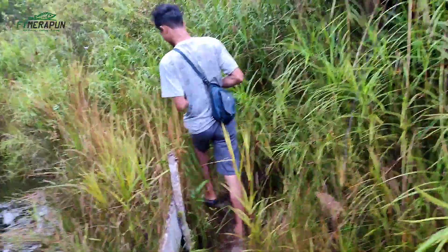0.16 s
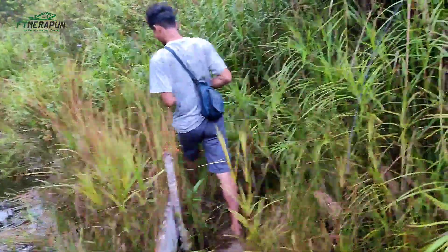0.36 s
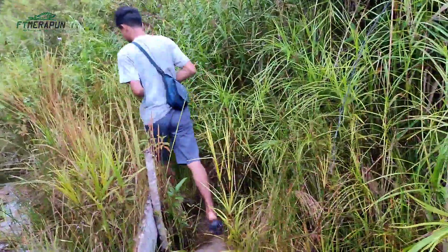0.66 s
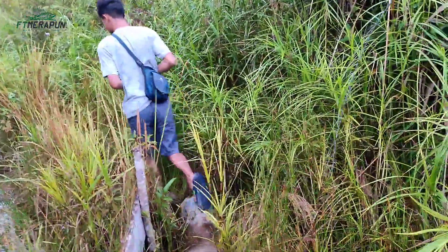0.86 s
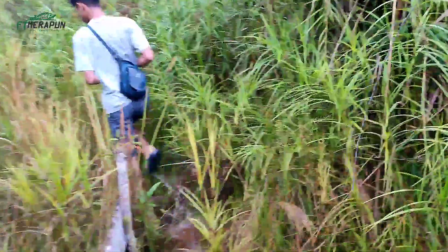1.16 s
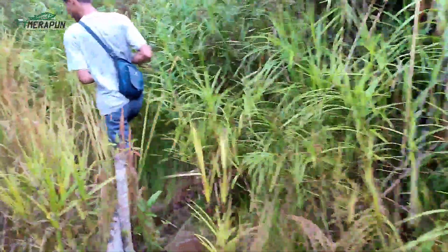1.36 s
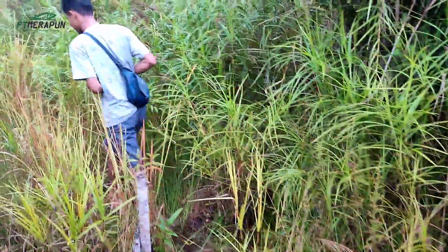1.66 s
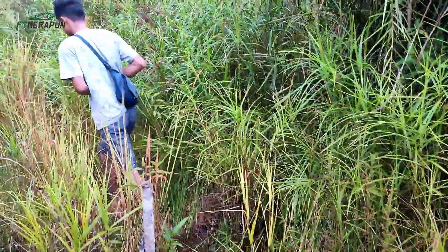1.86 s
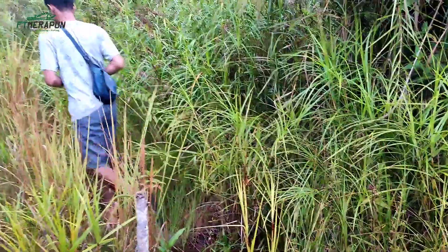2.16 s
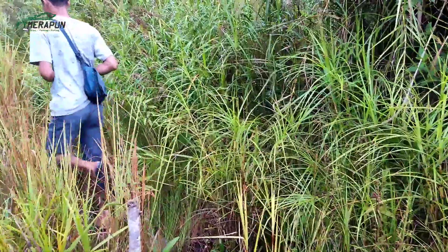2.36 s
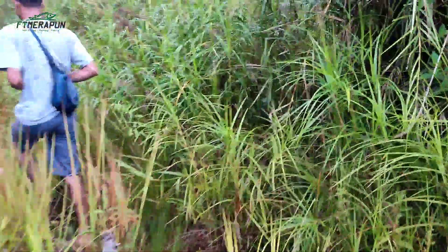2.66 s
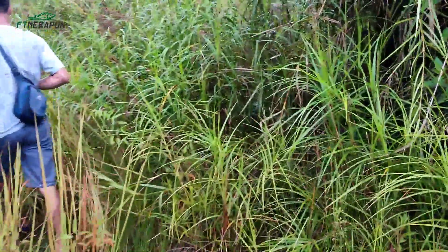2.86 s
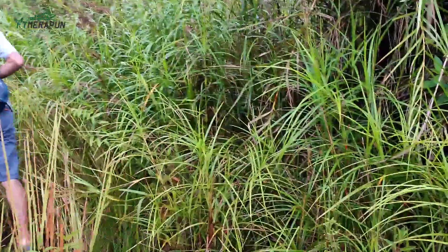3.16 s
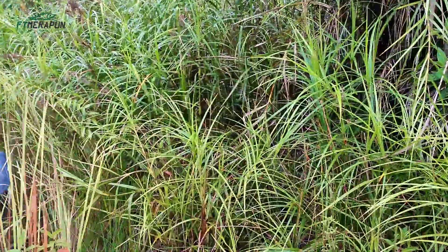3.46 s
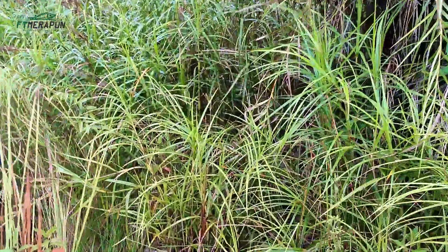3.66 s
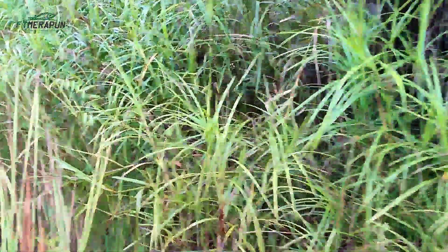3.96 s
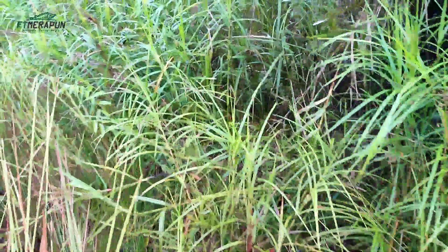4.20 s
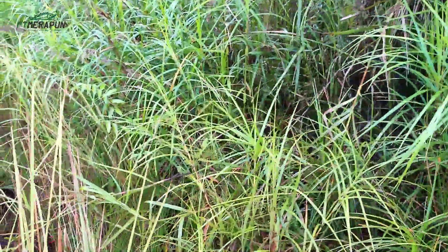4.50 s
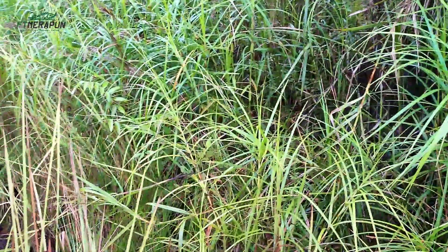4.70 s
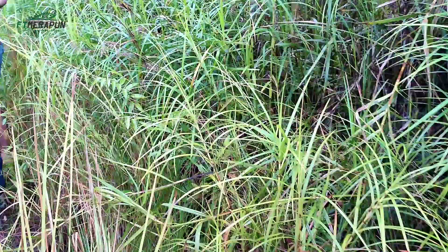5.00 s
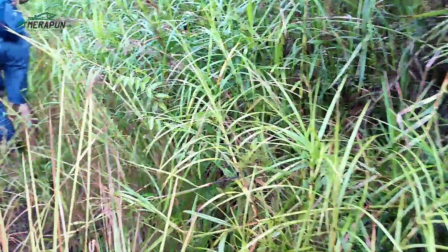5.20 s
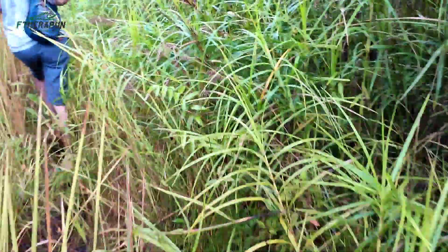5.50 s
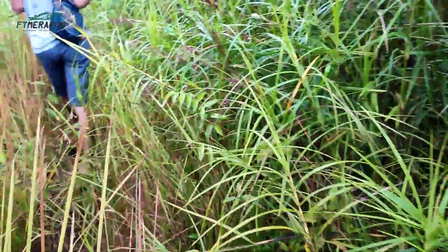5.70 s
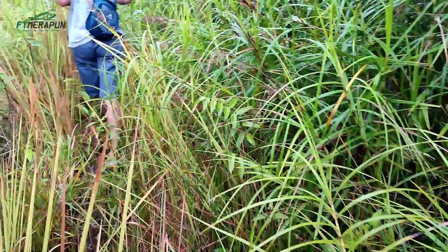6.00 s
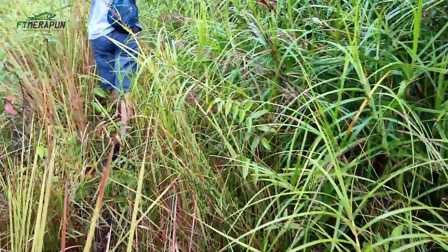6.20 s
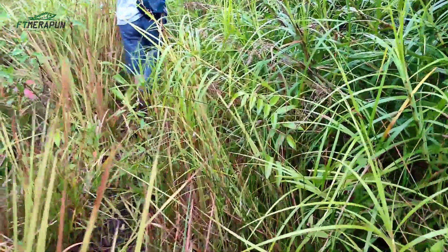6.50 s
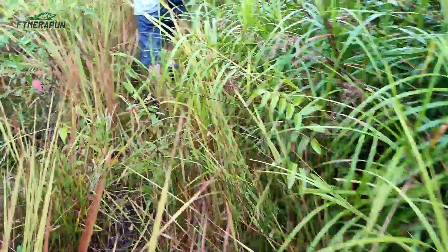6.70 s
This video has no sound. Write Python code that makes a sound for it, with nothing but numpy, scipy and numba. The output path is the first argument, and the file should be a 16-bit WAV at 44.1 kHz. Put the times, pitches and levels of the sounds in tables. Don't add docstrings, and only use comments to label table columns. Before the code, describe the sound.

Squelching, splashy footsteps push through wet tall grass, stalks snapping and blades rustling, over a steady thin cicada drone in an open marsh.

```python
import sys
import numpy as np
from scipy import signal
from scipy.fft import rfft, irfft
from scipy.io import wavfile
from scipy.ndimage import uniform_filter1d
from numba import njit

SR = 44100
rng = np.random.default_rng(int(sys.argv[2]) if len(sys.argv) > 2 else 0)


def gain_from_decibels(decibels):
    exponent = np.asarray(decibels, float) / 20
    return 10 ** exponent


def output_pcm(signal):
    pcm = np.clip(np.atleast_2d(signal).T, -1, 1) * 32767
    wavfile.write(sys.argv[1], SR, np.round(pcm).astype(np.int16))


N = 302085
T = np.arange(N) / SR
HZ = np.maximum(np.fft.rfftfreq(N, 1 / SR), 1)

# (time [s], hold [s], level [dB])
WADES = [(.0, 0.092, -53), (.3, 0.17, -50), (.6, 0.18, -52.5), (1.0, 0.39, -58), (1.38, 0.033, -46.5),
         (1.7, 0.27, -52), (2.0, 0.1, -58), (2.37, 0.0061, -54.5), (2.57, 0.12, -47), (3.1, 0.25, -48),
         (3.42, 0.31, -53), (4.0, 0.025, -53.5), (4.14, 0.016, -48.5), (4.66, 0.16, -57), (5.1, 0.029, -56),
         (5.31, 0.015, -52.5), (5.45, 0.074, -55.5), (5.8, 0.2, -47.5), (6.72, .13, -61)]
# (time [s], hold [s], thin stems [dB], thick minus thin stems [dB])
PUSHES = [(-0.002, 0.082, -43, -2.5), (0.285, 0.09, -46.5, -2), (0.472, 0.22, -46, -3),
          (0.81, 0.23, -49.5, -3), (1.07, 0.2, -49, -18), (1.267, 0.023, -42.5, -7.5),
          (1.41, 0.31, -46.5, -10), (2.095, 0.19, -51, 0), (2.36, 0.0088, -42, -6), (2.567, 0.039, -45, -4),
          (2.645, 0.22, -45, -9), (3.096, 0.22, -52.5, 4.5), (3.407, 0.22, -55, -1),
          (3.698, 0.055, -39, -2.5), (3.997, 0.026, -36.5, -6.5), (4.107, 0.027, -37.5, -10.5),
          (4.196, 0.026, -44, -10), (3.955, 0.011, -43.5, -3), (4.296, 0.023, -50.5, 0),
          (4.513, 0.24, -52.5, -10), (4.927, 0.078, -49, -1), (5.12, 0.011, -41.5, -3.5),
          (5.288, 0.016, -44.5, -4), (5.4, 0.033, -42.5, -6), (5.645, 0.026, -49, -5.5),
          (5.784, 0.29, -48.5, -2.5), (6.136, 0.23, -49.5, -1), (6.579, 0.012, -42.5, -7),
          (6.654, 0.019, -44.5, -9), (6.808, .1, -40, -6)]
# (time [s], peak level [dB], pitch [Hz], time to fade 60 dB [s])
RISERS = [(.004, -25.5, 1386, 0.04), (0.079, -25, 764, 0.043), (1.311, -17, 232, 0.047),
          (1.428, -35.5, 1065, 0.11), (2.045, -33.5, 436, 0.12), (2.245, -40, 807, 0.082),
          (2.351, -30, 1695, 0.076), (3.214, -30, 287, 0.132), (3.215, -21.5, 1495, 0.061),
          (3.224, -29.5, 846, 0.061), (3.239, -36, 416, 0.3), (4.16, -19, 782, 0.038),
          (4.415, -44, 793, 0.075), (4.78, -37.5, 684, 0.072), (4.81, -46, 461, 0.25),
          (4.92, -35, 1000, 0.078), (5.475, -37.5, 438, 0.08), (5.61, -36.5, 580, 0.16),
          (5.676, -29.5, 509, 0.051), (5.78, -22, 427, 0.054), (6.182, -30, 694, 0.051),
          (6.65, -40, 890, 0.043), (6.796, -18.5, 890, 0.013)]
# (time [s], peak level [dB], pitch [Hz], time to fade 60 dB [s])
HELD = [(0.055, -28, 970, 0.025), (.062, -34, 2680, 0.036), (0.305, -29, 1590, .028),
        (.362, -34.5, 584, 0.038), (1.043, -29, 1200, 0.017), (1.254, -33, 235, 0.048),
        (1.497, -32.5, 980, 0.02), (1.566, -26, 2640, 0.018), (1.81, -32, 1620, 0.025),
        (2.07, -32, 896, 0.041), (2.424, -31.5, 1400, 0.034), (3.092, -20, 438, 0.095),
        (3.11, -36, 2090, 0.098), (3.109, -20, 516, 0.028), (3.135, -22.5, 444, 0.066),
        (3.157, -35, 407, 0.091), (4.19, -39, 477, 0.15), (3.162, -23, 2460, 0.036),
        (3.199, -31, 488, 0.071), (3.226, -37.5, 265, 0.16), (3.412, -32.5, 730, 0.051),
        (4.564, -31, 477, 0.056), (4.679, -34.5, 425, 0.11), (5.122, -23.5, 1044, 0.032),
        (5.808, -19.5, 522, 0.034), (6.0, -29.5, 560, 0.035), (6.157, -34, 990, 0.049),
        (6.36, -28, 2500, 0.03), (6.754, -28, 1090, 0.01)]
# (time [s], peak level [dB], pitch [Hz], time to fade 60 dB [s])
PLOPS = [(1.372, -22, 216, 0.027), (2.584, -21.5, 377, 0.015), (2.599, -35, 308, 0.072),
         (2.643, -20, 990, 0.013), (2.682, -25.5, 224, 0.024), (3.259, -25, 600, 0.02),
         (3.727, -22.5, 1226, 0.045), (4.033, -21.5, 253, 0.014), (5.045, -32, 980, 0.03),
         (5.386, -22, 837, 0.032), (5.405, -27.5, 248, 0.038), (5.13, -34.5, 436, 0.041),
         (6.592, -31, 483, 0.039), (6.805, -14.5, 294, 0.026)]
# (time [s], peak level [dB], pitch [Hz])
SLAPS = [(0.558, -24.5, 1120), (1.249, -18, 590), (2.361, -24.5, 790), (2.37, -20.5, 1090),
         (2.583, -17.5, 1250), (3.093, -21.5, 736), (3.212, -20, 427), (3.225, -16, 480), (3.285, -25, 627),
         (3.349, -28, 540), (3.729, -20, 520), (4.108, -30.5, 372), (5.326, -19, 640), (5.79, -17.5, 720),
         (5.864, -21, 405), (6.28, -26.5, 844), (6.592, -14.5, 865), (6.593, -20.5, 1170),
         (6.798, -22.5, 420)]
# (time [s], peak level [dB], pitch [Hz])
KNOCKS = [(1.307, -18.5, 2100), (2.371, -22, 2000), (2.582, -24, 2030), (2.826, -24, 1480),
          (2.826, -17, 2270), (2.826, -25, 2700), (2.644, -29, 2720), (3.836, -30.5, 920),
          (4.171, -28, 1100), (3.772, -28, 2380), (3.82, -22, 1490), (3.829, -21, 2120),
          (4.01, -18.5, 1440), (4.032, -17.5, 2640), (4.032, -20.5, 1890), (4.109, -19.5, 2570),
          (4.325, -31, 2800), (5.326, -22.5, 1230), (6.576, -24, 1920), (0.551, -30, 1580),
          (6.591, -29, 2700), (6.592, -24, 1820), (6.829, -22.5, 1990)]
# (time [s], length [s], start pitch [Hz], end pitch [Hz], level [dB])
SQUEEZES = [(.0, 0.18, 1496, 1390, -49), (0.32, 0.12, 157, 174, -59), (1.38, 0.033, 594, 1290, -47),
            (1.6, 0.092, 150, 178, -59), (1.57, 0.052, 330, 656, -48), (4.25, 0.11, 2040, 2314, -50),
            (4.48, 0.101, 2770, 3000, -52), (4.49, .07, 2500, 2720, -56), (5.17, 0.055, 145, 157, -53),
            (5.69, 0.038, 732, 1445, -47.5), (5.91, 0.084, 309, 457, -52)]
# (time [s], length [s], start pitch [Hz], end pitch [Hz], level [dB])
REEDS = [(1.39, 0.18, 2770, 2680, -53), (1.58, 0.19, 2660, 2800, -54.5), (1.6, 0.11, 3740, 3750, -59),
         (2.648, 0.071, 2267, 2210, -41.5), (2.715, .09, 2240, 2230, -60), (4.43, 0.041, 963, 2360, -51),
         (4.462, 0.045, 2136, 3115, -44), (4.69, 0.093, 427, 450, -56), (4.86, 0.056, 475, 800, -56),
         (5.95, .035, 2160, 2430, -51), (5.72, 0.044, 1330, 1480, -48.5)]
# (pitch [Hz], level per Hz [dB])
RUSTLE = [(100, -16), (250, -15), (700, -4), (1100, 0.5), (4200, 4), (5400, -6.5), (7200, -2.5),
          (8800, -16), (14500, -18.5)]
# (time [s], peak level [dB], body minus edge [dB])
SNAPS = [(0.232, -25, -28), (0.446, -27, -14), (0.46, -21, -24), (1.048, -28.5, 3), (1.2474, -25.5, 0),
         (1.295, -18.5, 1), (2.3772, -22, -0.5), (2.5503, -23.5, -1.5), (2.583, -20, -1), (2.585, -21, -4),
         (2.684, -25, 5), (2.797, -22, -3), (2.826, -23.5, -1), (3.7148, -24, -3), (3.759, -25, 10.5),
         (4.013, -19, 4), (4.0033, -27, 1), (4.0721, -20, -16), (4.113, -25, -2), (4.201, -23, -9),
         (4.3193, -20.5, -1.5), (4.3323, -26, 4.5), (5.131, -18, -4), (5.3093, -27, 5), (5.326, -20.5, 1.5),
         (5.329, -19, -3), (1.072, -27, 7), (3.77, -28, 10), (4.034, -25, 0), (5.3896, -43, 3),
         (5.4046, -26, -3), (6.593, -25, 8), (6.789, -27, -2), (6.8066, -17, 2.5)]
# (time [s], peak level [dB], pitch [Hz])
TICKS = [(0.2417, -33, 1870), (0.4602, -21.5, 4500), (0.5476, -28.5, 1660), (0.565, -42, 1780),
         (0.842, -39, 1490), (0.8573, -29, 2850), (0.9238, -36, 1660), (0.9978, -36, 2260),
         (1.068, -34, 4050), (1.1846, -34, 3820), (1.215, -35, 2950), (1.2478, -18.5, 3860),
         (1.2929, -31, 2230), (1.4538, -36, 2780), (1.9562, -37, 1560), (2.205, -34, 2050),
         (2.2831, -28, 3770), (2.3206, -33.5, 1370), (2.606, -27, 3220), (2.643, -34, 2230),
         (2.7476, -31, 2200), (2.7949, -34, 3580), (2.8733, -35, 2160), (3.071, -35, 1420),
         (3.5947, -29.5, 2400), (3.655, -30, 2420), (3.7019, -31, 1390), (3.7333, -26, 1650),
         (3.7558, -27, 2000), (3.777, -24, 3630), (3.9359, -29, 2370), (3.9645, -26, 1490),
         (4.0424, -29, 2800), (4.1194, -31, 2870), (4.2167, -24.5, 3160), (4.2455, -40, 2200),
         (4.306, -36, 2250), (4.34, -31, 3150), (4.5444, -53, 3000), (4.7047, -43, 3880),
         (4.9087, -42, 3820), (4.9344, -48, 3710), (4.9794, -33.5, 3540), (4.9985, -39, 4000),
         (5.0674, -38, 2000), (5.1256, -34, 1880), (5.2983, -27, 4000), (5.3267, -31, 4160),
         (5.372, -28, 4280), (5.641, -42, 2890), (5.7462, -53, 1410), (5.808, -33, 2060),
         (5.926, -33, 1780), (5.9937, -32.5, 1410), (6.06, -35, 2620), (6.5475, -37, 3370),
         (6.6328, -34, 2520), (6.6774, -34, 3100), (6.7735, -31, 2300), (6.804, -23, 3970)]
# (time [s], peak level [dB], pitch [Hz])
FLICKS = [(0.4534, -26, 7190), (0.4604, -30, 7060), (0.8609, -52, 7080), (1.0455, -37, 7200),
          (1.2466, -23, 7500), (1.2945, -29, 7900), (2.378, -31, 7000), (2.5491, -36, 6930),
          (2.5845, -32, 7200), (2.5845, -22, 7000), (2.6833, -36, 7100), (2.7217, -37, 7700),
          (2.7836, -35, 7010), (2.797, -33, 7200), (2.8165, -30, 7130), (2.9243, -45, 7350),
          (3.1088, -38, 7050), (3.7145, -28, 7080), (3.7584, -34, 7250), (3.8856, -41, 6900),
          (3.8856, -38, 7090), (4.0033, -15.5, 7250), (4.0342, -31, 7400), (4.0721, -29, 7200),
          (4.1116, -32, 7150), (4.1984, -27, 7000), (4.3166, -31, 7460), (4.3316, -38, 7380),
          (5.1262, -29, 7310), (5.3243, -33, 7600), (5.3896, -41, 7220), (5.4056, -28, 7040),
          (6.5929, -33, 7500), (6.759, -36, 6980), (6.788, -35, 7140), (6.8059, -32, 7030)]
# (time [s], peak level [dB], pitch [Hz])
DRIPS = [(0.127, -40, 1200), (0.159, -44, 210), (0.344, -49, 506), (0.362, -34, 649), (0.644, -32, 651),
         (0.712, -37, 640), (0.906, -49, 1140), (0.954, -40, 667), (1.189, -35, 1050), (1.389, -42, 218),
         (1.454, -37, 1110), (1.727, -37, 595), (1.769, -36, 960), (1.794, -45, 536), (2.734, -34, 961),
         (3.091, -19.5, 432), (3.619, -40, 1280), (3.739, -25, 1020), (3.937, -43, 1090), (4.031, -32, 247),
         (4.129, -41, 781), (4.518, -44.5, 590), (4.949, -47, 1230), (4.984, -40, 1080), (5.074, -31, 851),
         (5.544, -37, 1070), (5.589, -37, 660), (5.829, -40, 530), (5.939, -36, 412), (6.029, -41, 1100)]
# (pitch [Hz], width [Hz], level [dB])
CICADA = [(6383, 437, 6), (6940, 73, -9.5), (7760, 420, -12.5), (13200, 1100, -12)]
# (time [s], length [s], level [dB])
BIRD = [
    (2.08, 0.059, -52),
    (2.177, 0.059, -40),
    (2.272, 0.069, -44),
    (2.385, 0.074, -40),
    (4.63, 0.05, -49),
    (4.702, 0.074, -48),
    (4.793, .06, -44.5),
    (4.917, 0.066, -47),
]
# (pitch [Hz], level per Hz [dB])
MARSH = [(12, 0), (20, 1.5), (40, -8.5), (128, -8.5), (328, -9), (989, -52), (2250, -6.5), (4450, -13.5),
         (5500, -3), (7150, -10), (12100, -120)]
# (time [s], hold [s], level [dB])
HUM = [
    (.0, .2, -54),
    (.9, .5, -64),
    (1.89, 1.14, -59.5),
    (4.2, .1, -69),
    (5.2, .1, -58),
    (6.7, .04, -61),
]
# (pitch [Hz], left minus right [dB])
PORTS = [(400, 0.5), (1300, -1), (2400, -3.5), (4400, -5.5), (6900, -10), (9500, -5), (13000, 0)]


def unit(x):
    return x / np.sqrt(np.mean(x ** 2))


def colour(points, hz):
    f, db = np.transpose(points)
    return gain_from_decibels(np.interp(np.log(hz), np.log(f), db))


def band(spectrum, hz, octaves):
    return irfft(spectrum * np.exp(-.5 * (np.log2(HZ / hz) / octaves) ** 2), N)


def ports(mid, side):
    share = np.minimum(HZ / 3000, 1)
    opposite = np.array([[1], [-1]])
    return (rfft(mid) + share * rfft(side) * opposite) / np.sqrt(1 + share ** 2)


def walk(rate):
    hold = int(SR / rate)
    levels = np.repeat(rng.standard_normal(N // hold + 1), hold)
    return 1.3 * uniform_filter1d(uniform_filter1d(levels, hold), hold)[:N]


@njit
def ring(start, size, hz, t60, glide, lead, rise):
    out = np.zeros((2, N))
    for k in range(len(start)):
        first = int(start[k] * SR)
        phase, fade, f = 0., np.log(1000) / (t60[k] * SR), hz[k]
        for i in range(min(int(t60[k] * SR), N - first)):
            g = size[k] * np.exp(-fade * i) * min(i / (rise[k] * SR), 1.)
            out[0, first + i] += g * np.sin(phase + lead[k])
            out[1, first + i] += g * np.sin(phase - lead[k])
            phase += 2 * np.pi * f / SR
            f = min(f * 2 ** (glide[k] / SR), 2 * hz[k])
    return out


def whistles(notes):
    out = np.zeros(N)
    for s, length, hz0, hz1, db in notes:
        u = np.clip((T - s) / length, 0, 1)
        cycles = length * (hz0 * u + (hz1 - hz0) * u ** 2 / 2)
        out += gain_from_decibels(db) * np.sin(np.pi * u ** 0.69) * np.sin(2 * np.pi * cycles)
    return out


def moves(rows, rise_db_s, fall_db_s):
    power = 0
    for s, hold, db in rows:
        before, after = np.maximum(s - T, 0), np.maximum(T - s - hold, 0)
        power = power + gain_from_decibels(db - rise_db_s * before - fall_db_s * after) ** 2
    return power


def walking():
    wade = moves(WADES, 175, 103)
    push_rise_db_s, push_fall_db_s = 108, 93
    thin = moves([row[:3] for row in PUSHES], push_rise_db_s, push_fall_db_s)
    thick_rows = [(s, hold, db + thick_db) for s, hold, db, thick_db in PUSHES]
    thick = moves(thick_rows, push_rise_db_s, push_fall_db_s)
    thick = thick + wade * gain_from_decibels(2 * -4.5)
    leaves = thin * gain_from_decibels(2 * -8)
    still = gain_from_decibels(2 * -69)
    return 10 * np.log10(np.array([wade, thick, thin, leaves]) + still)


def effort_at(walking_db, hz):
    edges = np.log([500, 900, 1700, 2600, 4500, 7000])
    roles = ([1, 0, 0, 0, 0, 0], [0, 1, 1, 0, 0, 0], [0, 0, 0, 1, 1, 0], [0, 0, 0, 0, 0, 1])
    return sum(np.interp(np.log(hz), edges, role) * db for role, db in zip(roles, walking_db))


def pockets():
    rows = [(*row, 1.3 / row[3]) for row in RISERS]
    rows += [(*row, 1.6) for row in HELD]
    rows += [(*row, -6.5) for row in PLOPS]  # sag, octaves/s
    rows += [(*row, 0.013, 4.7) for row in KNOCKS]
    rows += [(*row, 0.011 * np.sqrt(1000 / row[2]), 12) for row in SLAPS]
    s, db, hz, t60, glide = np.transpose(rows)
    lag_s = .0001
    lead = np.pi * hz * lag_s * rng.standard_normal(len(s))
    t60 = np.clip(t60, .004, .4)
    swell = np.where(np.arange(len(s)) < len(RISERS), .14, .08)
    return ring(s, gain_from_decibels(db), hz, t60, glide, lead, t60 * swell)


def grains(walking_db, low_hz, octaves, cycles, db, spread_db, climb, count, size):
    when, pitch, luck, place = np.repeat(rng.random((count, 4)), size, axis=0).T
    u = rng.random((count * size, 3)).T
    s = np.minimum(when * N / SR + 0.001914 * u[0], (N - 1) / SR)
    hz = low_hz * 2 ** (octaves * pitch + 0.91 * u[1])
    effort_db = effort_at(walking_db[:, (s * SR).astype(int)], hz)
    db = db + effort_db + spread_db * np.minimum(-np.log(luck), 3)
    t60 = cycles * (.45 + 1.2 * u[2]) / hz
    lag_s = .0001
    lead = np.pi * hz * lag_s * 3.5 * (place - .5)
    return ring(s, colour(RUSTLE, hz) * gain_from_decibels(db), hz, t60, climb * hz * u[2], lead, 0.26 * t60)


def squeezes():
    tone = whistles(SQUEEZES) * gain_from_decibels(3 * walk(120))
    high = irfft(rfft(tone) / (1 + (1500 / HZ) ** 4), N)
    squeaks = tone * (1 + .7 * walk(350)) + .8 * high * walk(1100)
    reeds = whistles(REEDS) * gain_from_decibels(3 * walk(90)) * (.9 + .5 * walk(500))
    return squeaks + reeds


def splashing(walking_db):
    bubbles = grains(walking_db, 219, 3.4, cycles=33.7, db=8.5, spread_db=2.5, climb=0.0086,
                     count=1900, size=1)
    water = pockets() * gain_from_decibels(1.5 * walk(160)) + bubbles + squeezes()
    noise = np.pad(rng.standard_normal((2, 3000)), ((0, 0), (0, N - 3000)))
    scatter = irfft(ports(*noise), N)[:, :3000] * np.exp(-T[:3000] / .02) * gain_from_decibels(-37)
    water = water + signal.fftconvolve(water, scatter, axes=1)[:, :N]
    return signal.sosfilt(signal.butter(2, 110, "high", fs=SR, output="sos"), water)


def crackle(walking_db):
    return grains(walking_db, 491, 3.65, cycles=3.9, db=5.0, spread_db=3.5, climb=0.0036,
                  count=2600, size=3)


def rustle(walking_db):
    pair = ports(*rng.standard_normal((2, N))) * colour(RUSTLE, HZ)
    # (Hz, octaves)
    widths = ((330, .8), (1300, .5), (3400, .45), (11000, .3))
    gain_db = [[-20 * np.log10(np.std(band(pair[0], hz, wide)))] for hz, wide in widths]
    out, shared = 0, walk(170)
    for octave in np.arange(0, 7.1, .5):
        hz = 140 * 2 ** octave
        strands_db = 2 * shared + 2.6 * walk(70) + 1.0 * walk(12)
        leaves_db = np.interp(hz, [3000, 8000], [-8.5, -6])
        level_db = effort_at(walking_db + gain_db, hz) + strands_db + leaves_db
        out = out + gain_from_decibels(level_db) * band(pair, hz, .22)
    return out


def snaps():
    edge_s, body_s, rise_s = .002, .004, .0006
    edge, body, t = np.zeros((2, N)), np.zeros((2, N)), T[:900]
    for (s, db, body_db), noise in zip(SNAPS, rng.standard_normal((len(SNAPS), 2, 900))):
        i = int(s * SR)
        noise = noise * np.minimum(t / rise_s, 1)
        edge[:, i:i + 900] += (gain_from_decibels(db) * noise * np.exp(-t / edge_s))[:, :N - i]
        body[:, i:i + 900] += (gain_from_decibels(db + body_db) * noise * np.exp(-t / body_s))[:, :N - i]
    tick = gain_from_decibels(-8) * band(ports(*edge), 12000, .25)
    bright = gain_from_decibels(3) * band(ports(*edge), 6890, 0.12)
    return tick + bright + gain_from_decibels(-2.0) * band(ports(*body), 3100, 0.49)


def ticks():
    s, db, hz = np.repeat(TICKS + FLICKS, 3, axis=0).T
    u = rng.random((len(s), 3)).T - .5
    neighbour = np.arange(len(s)) % 3 - 1
    hz = hz * 2 ** (.5 * neighbour * (.5 + u[0] / 2))
    t60 = 35 / np.minimum(hz, 5000)
    lag_s = .0001
    lead = 2 * np.pi * hz * lag_s * u[2]
    cracks = ring(s + .0006 * u[1], gain_from_decibels(db - 2), hz, t60, 0 * s, lead, .1 * t60)
    s, db, hz = np.transpose(DRIPS)
    drips = ring(1. * s, gain_from_decibels(db), 1. * hz, 10.4 / hz, 2.9 + 0 * s, 0 * s, 0.87 / hz)
    return cracks + drips


def cicadas():
    clicks_per_s = 2500
    clicks = (rng.random((2, N)) < clicks_per_s / SR) * rng.standard_normal((2, N))
    body = sum(gain_from_decibels(db) / np.sqrt(w) / (1 + (2 * (HZ - f) / w) ** 4) for f, w, db in CICADA)
    throb_db = 1.1 * np.sin(2 * np.pi * 10.6 * T + 3.5 * walk(1.78)) + .6 * walk(30)
    return unit(irfft(rfft(clicks) * body, N)) * gain_from_decibels(-47 + throb_db)


def bird():
    blur_s = 0.0072
    song = [(s, length, 3880, 3740, db) for s, length, db in BIRD]
    notes = whistles(song) * gain_from_decibels(3.2 * walk(260) - 7)
    leaves = rng.standard_normal((2, 3000)) * np.exp(-T[:3000] / blur_s) / np.sqrt(blur_s * SR)
    return 1.1 * notes + .9 * signal.fftconvolve([notes], leaves, axes=1)[:, :N]


def marsh():
    wind = 4.9 * rfft(rng.standard_normal((2, N))) / (1 + (HZ / 90) ** 4)
    pair = ports(*rng.standard_normal((2, N))) + wind
    hush = unit(irfft(pair * colour(MARSH, HZ), N)) * gain_from_decibels(-55.5 + 0.41 * walk(2.73))
    air = unit(band(rfft(rng.standard_normal((2, N))), 9000, 0.39)) * gain_from_decibels(-62)
    motor_hz = 48.8 + .5 * walk(4.7)
    motor = np.sin(2 * np.pi * np.cumsum(motor_hz) / SR) * np.sqrt(moves(HUM, 90, 90))
    return hush + air + motor


def scene():
    walking_db = walking()
    water = splashing(walking_db)
    grass = crackle(walking_db) + rustle(walking_db) + snaps() + ticks()
    return water + grass + cicadas() + bird() + marsh()


def top_cut(x):
    return signal.sosfilt(signal.butter(12, 15420, fs=SR, output="sos"), x)


def record(dry):
    tilt = np.sqrt(colour(PORTS, HZ))
    top = 1 / (1 + (HZ / 14350) ** 110)
    mix = irfft(rfft(dry) * top * np.array([tilt, 1 / tilt]), N)
    return top_cut(mix)


dry = scene()
out = record(dry)
output_pcm(out)
```